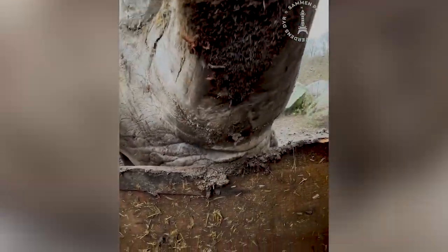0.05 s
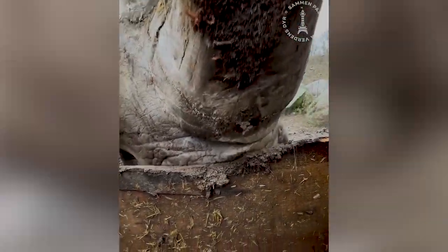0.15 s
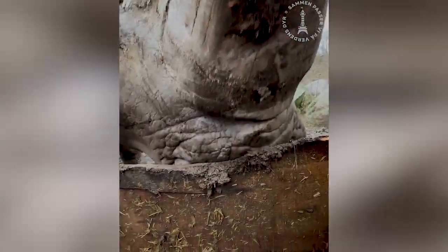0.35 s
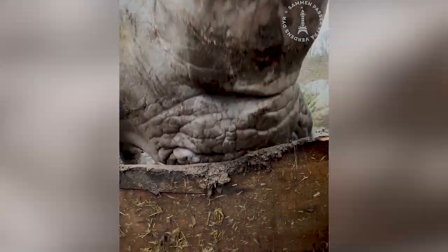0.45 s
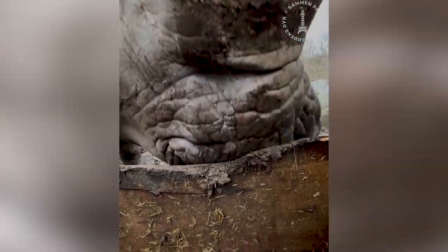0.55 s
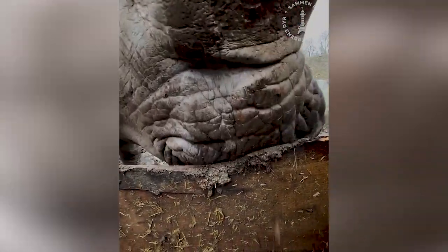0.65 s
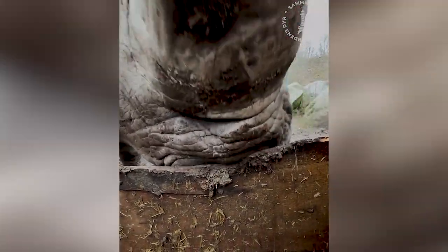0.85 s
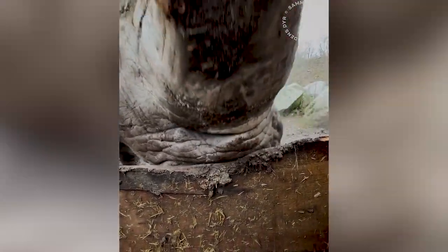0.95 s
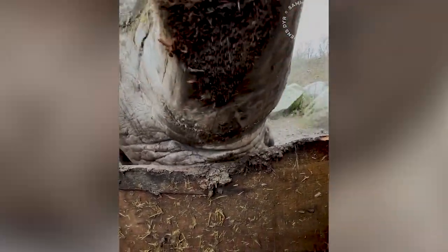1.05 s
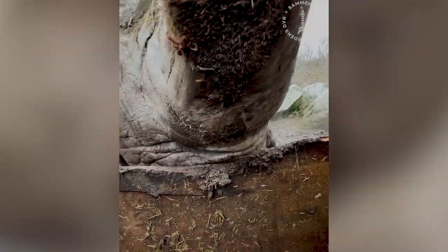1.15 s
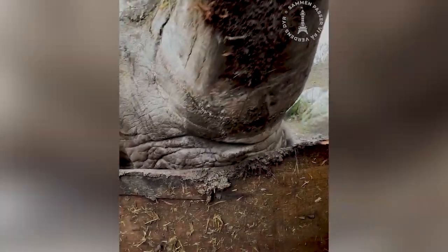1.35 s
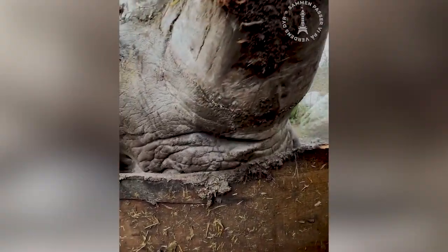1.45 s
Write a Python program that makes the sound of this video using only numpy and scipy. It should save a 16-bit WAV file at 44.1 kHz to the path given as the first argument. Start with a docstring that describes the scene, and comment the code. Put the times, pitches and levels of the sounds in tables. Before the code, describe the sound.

Rough horn scrapes on wood, heard up close in still outdoor air: a rhino's light rub stutters, then two strong rasping strokes and a lighter one follow. Small splinters snap and the heavy log rumbles and bumps softly.

```python
"""A rhinoceros rubs its horn to and fro on a log, close by.
A light drag catches in a short stick-slip judder and runs on as a hard scrape; a return scrape
and another light drag follow. Each slip excites the hollow log's modes, the wood fibres rasp and
hiss, splinters snap, and the heavy log rumbles under the load. Behind it are faint outdoor air
and one thin, far whistle."""
import sys
import numpy as np
from scipy import signal
from scipy.fft import rfft, irfft, next_fast_len
from scipy.io import wavfile
from scipy.ndimage import uniform_filter1d, map_coordinates

SR = 44100
rng = np.random.default_rng(int(sys.argv[2]) if len(sys.argv) > 2 else 0)


def file_out(sig):
    """Save sig as 16-bit WAV at sys.argv[1]."""
    # one column per channel
    cols = np.atleast_2d(sig).T
    # limit, then scale
    lim = np.clip(cols, -1, 1)
    pcm = np.round(lim * 32767).astype(np.int16)
    wavfile.write(sys.argv[1], SR, pcm)


N = 66150

# Modes of the hollow log: pitch_hz, width_hz, gain_db
LOG_MODES = [(314.3, 31.7, 3.5), (363.4, 34, -3), (434.4, 21.3, -3.5), (499, 17, -1), (561.4, 28.8, 1),
             (768, 110, -21), (891, 23.3, -7.5)]
# Low modes of the log on its bed: pitch_hz, width_hz, gain_db
BED_MODES = [(84.3, 26.6, 5.5), (130, 43, -0.5)]
# Spectrum of the fibres in the hard scrape: frequency_hz, gain_db
PUSH_SPECTRUM = [(590, 11.5), (1000, -5.5), (1200, -1), (1320, -3), (1490, -1), (2130, -2), (2590, 1.5),
                 (4390, -10), (5150, -5.5), (5980, -10), (7270, -8), (8640, -11), (10100, -12),
                 (15500, -16)]
RASP_LOW_HZ, HISS_LOW_HZ = 895, 4450


def amp(db):
    """Decibels to amplitude ratio."""
    return 10 ** (np.asarray(db) / 20)


def unit(x):
    """Normalisation to rms 1."""
    return x / np.sqrt(np.mean(x ** 2) + 1e-20)


def steady(x, size):
    """Normalisation to rms 1 over a sliding window of size samples."""
    power = uniform_filter1d(np.mean(x ** 2, axis=0), size)
    return x / np.sqrt(np.abs(power) + 1e-12)


def along(points, hz):
    """Interpolation of (frequency_hz, value) points on a logarithmic axis."""
    f, values = np.transpose(points)
    return np.interp(np.log(hz + 1), np.log(f + 1), values)


def clock():
    """Time of each sample in seconds."""
    return np.arange(N) / SR


def curves(rows):
    """Linear interpolation in time of each column after the first."""
    time_s, *columns = np.transpose(rows)
    return [np.interp(clock(), time_s, column) for column in columns]


def wobble(per_s):
    """Smooth random modulation: a spline through per_s knots a second."""
    return map_coordinates(rng.standard_normal(N), [clock() * per_s + 2])


def filtered(x, response):
    """Linear filtering: the spectrum of x times a frequency response."""
    size = next_fast_len(N + 8192, real=True)
    return irfft(rfft(x, size) * response(np.fft.rfftfreq(size, 1 / SR)), size)[..., :N]


def above(f, edge_hz, order=6):
    """Magnitude response of a steep high-pass."""
    ratio = (f / edge_hz) ** order
    return ratio / np.sqrt(1 + ratio * ratio)


def ring(x, modes, damping=1):
    """Modal superposition: x drives damped resonators of alternating sign."""
    def response(f):
        total = 0
        for k, (hz, width_hz, db) in enumerate(modes):
            loss = 1j * f * width_hz * damping
            total += (-1) ** k * amp(db) * loss / (hz * hz - f * f + loss)
        return total
    return filtered(x, response)


def spread(pair):
    """Partial coherence: two independent signals become left and right, most alike in the bass."""
    # Likeness of left and right: frequency_hz, correlation
    coherence = [(60, 1), (110, 1), (200, 1), (380, 0.95), (700, 0.56), (1290, 0.99), (2380, 1),
                 (4400, 0.12), (6500, 1), (9000, 0.68), (15000, 0.71)]
    angle = lambda f: np.arccos(np.clip(along(coherence, f), -1, 1)) / 2
    mid, side = filtered(pair, lambda f: np.array([np.cos(angle(f)), np.sin(angle(f))]))
    return np.array([mid + side, mid - side])


def fibres(slips_per_s=5000, scatter_db=2.5, slip_share=0.45):
    """Shot noise: countless tiny slips of wood fibres over a smooth rub."""
    hits = rng.random((2, N)) < slips_per_s / SR
    slips = hits * rng.choice([-1, 1], (2, N)) * amp(scatter_db * rng.standard_normal((2, N)))
    rub = rng.standard_normal((2, N))
    return spread(np.sqrt(slip_share) * unit(slips) + np.sqrt(1 - slip_share) * rub)


def bright_spots(x, depth_db=1.73):
    """Spectral modulation: bright spots come and go as the contact moves over the grain."""
    spectra = signal.stft(x, nperseg=512)[2]
    patches = uniform_filter1d(rng.standard_normal(spectra.shape[1:]), size=7, axis=0)
    patches = uniform_filter1d(patches, size=5, axis=1)
    return signal.istft(spectra * amp(depth_db * unit(patches)), nperseg=512)[1][:, :N]


def upper_modes(x, depth_db=1.5, spacing_hz=44.9):
    """Modal overlap: the crowded upper modes of horn and log ripple the spectrum."""
    knots = rng.standard_normal(SR)
    return filtered(x, lambda f: amp(depth_db * map_coordinates(knots, [f / spacing_hz])))


def scrapes():
    """Sliding friction rings the log, rasps and hisses; each stroke meets the grain differently."""
    # Envelopes of the four strokes: time_s, ring_db, rasp_db, hiss_db
    lead_in = [(0.0, -53.5, -62, -55), (0.018, -46.5, -52, -54), (0.068, -46.5, -45, -49.5),
               (0.112, -50, -50, -54.5), (0.158, -44, -45, -47.5), (0.205, -38.5, -44.5, -51)]
    push = [(0.325, -30, -37.5, -42), (0.365, -39.5, -33, -40), (0.381, -29, -33, -38.5),
            (0.409, -44.5, -33.5, -37.5), (0.473, -36.5, -38.5, -40.5), (0.485, -33.5, -33.5, -38),
            (0.541, -41.5, -38.5, -42), (0.599, -41, -44.5, -48), (0.627, -41, -57, -57),
            (0.641, -63, -64, -69), (0.66, -73, -72, -77)]
    pull = [(0.69, -81, -66.5, -70), (0.758, -55, -57, -56.5), (0.768, -52, -56, -57),
            (0.806, -53, -55, -50), (0.884, -33.5, -33, -40.5), (0.93, -40, -32.5, -40.5),
            (1.028, -39, -36.5, -43.5), (1.066, -46, -46.5, -55), (1.086, -63, -62, -72),
            (1.1, -78, -66, -78)]
    drag = [(1.13, -65, -70, -75), (1.15, -60, -62.5, -69), (1.194, -52.5, -55, -55.5),
            (1.302, -53, -54, -54), (1.314, -57.5, -53, -53.5), (1.388, -50.5, -52, -54),
            (1.402, -43.5, -47.5, -50.5), (1.5, -40.5, -49, -53.5)]
    # Spectra of the rubbed fibres: frequency_hz, gain_db
    lead_in_spectrum = [(590, -43), (1000, -18), (1290, -7.5), (1660, -7.5), (2010, -0.5), (3410, -9),
                        (3740, -11), (5460, -10.5), (8440, -16), (15500, -20)]
    pull_spectrum = [(590, 4), (1000, -4.5), (1240, -12), (1460, -4), (1580, -9), (1820, -0.5), (1970, -7),
                     (2360, -3.5), (2740, -9.5), (3260, -9.5), (4440, -13.5), (4700, -8.5), (6790, -9),
                     (7610, -7.5), (9470, -8), (11800, -12), (15500, -14)]
    drag_spectrum = [(590, -16), (1000, -3), (1430, -4.5), (2160, -3), (2620, -2.5), (2840, -6),
                     (3010, -6.5), (4920, -5.5), (6410, -3), (15500, -10.5)]
    # Coupling of each stroke's contact point to the log's lowest mode: gain_db
    coupling_db = [-3, -3, -6.5, 3]
    strokes = [lead_in, push, pull, drag]
    ring_db, rasp_db, hiss_db = curves(np.vstack(strokes))
    drive = fibres()
    coarse = upper_modes(bright_spots(fibres()))
    fine = upper_modes(bright_spots(fibres()))
    below_hiss = lambda f: np.sqrt(np.abs(1 - above(f, HISS_LOW_HZ) ** 2))
    coarse = filtered(coarse, lambda f: above(f, RASP_LOW_HZ) * below_hiss(f))
    fine = filtered(fine, lambda f: above(f, HISS_LOW_HZ))
    out = np.zeros((2, N))
    for k, spectrum in enumerate([lead_in_spectrum, PUSH_SPECTRUM, pull_spectrum, drag_spectrum]):
        active, = curves([(row[0], j == k) for j, stroke in enumerate(strokes) for row in stroke])
        modes = [(hz, width, db + coupling_db[k] * (j == 0))
                 for j, (hz, width, db) in enumerate(LOG_MODES)]
        body = amp(ring_db + 0.5) * steady(ring(drive, modes), size=1500)
        rasp, hiss = filtered(np.array([coarse, fine]), lambda f: amp(along(spectrum, f)))
        rasp = amp(rasp_db - 0.5) * steady(rasp, size=2000)
        hiss = amp(hiss_db + 0.5) * steady(hiss, size=2000)
        out += np.sqrt(active) * (body + rasp + hiss)  # equal-power crossfade
    return out * amp(-0.02 * wobble(per_s=180))


def rumble(lurch_db=1.5):
    """Forced vibration: the log shudders on its bed under a lurching load, and rocks three times."""
    # Envelope of the shudder: time_s, level_db
    envelope = [(0, -55), (.05, -41), (.18, -45.5), (.3, -32.5), (.4, -44.5), (.49, -37.5), (.61, -41.5),
                (.77, -48), (.85, -45.5), (.92, -45), (.97, -41), (1.14, -41), (1.25, -43), (1.37, -45.5),
                (1.45, -36.5), (1.5, -41.5)]
    # Spectrum of the shudder: frequency_hz, gain_db
    spectrum = [(20, -44), (35, -2), (50, -4.5), (80, 2), (110, -3.5), (145, -3.5), (190, -18), (300, -23),
                (700, -30), (2000, -84)]
    # Bumps of the rocking log: start_s, peak_db
    rocks = [(.893, -30), (1.168, -30.5), (1.452, -29)]
    level_db, = curves(envelope)
    shudder = filtered(spread(rng.standard_normal((2, N))), lambda f: amp(along(spectrum, f)))
    thump = ring(signal.unit_impulse(N), BED_MODES[:1], damping=1.1)
    thump = ring(thump, BED_MODES[:1], damping=1.1)  # a second pass rounds the attack
    thump /= np.abs(thump).max()
    bumps = sum(amp(db) * np.pad(thump, (round(start_s * SR), 0))[:N] for start_s, db in rocks)
    return amp(level_db + lurch_db * wobble(per_s=44)) * steady(shudder, size=1500) + bumps


def air(level_db=-52.5):
    """Stationary noise: the faint background of still outdoor air."""
    # Spectrum of the background: frequency_hz, gain_db
    spectrum = [(30, -8.5), (150, -0.5), (300, -3), (500, -12), (1200, -13.5), (2500, -29.5), (3700, -36),
                (4400, -44), (5300, -33), (8000, -35), (15000, -39)]
    noise = spread(rng.standard_normal((2, N)))
    return amp(level_db) * unit(filtered(noise, lambda f: amp(along(spectrum, f))))


def splinters():
    """Narrow-band transients: raised fibres snap or squeak as the horn catches them."""
    # Catches: start_s, length_s, pitch_hz, half_width_hz, level_db
    catches = [(0.048, 0.011, 2130, 700, -48), (0.117, .012, 6400, 894, -50.5),
               (0.378, 0.0058, 2400, 447, -29.5), (.763, 0.0071, 8900, 2000, -48),
               (0.765, 0.0078, 3330, 398, -49.5), (0.767, 0.011, 2360, 493, -47),
               (0.809, 0.018, 9300, 600, -50), (0.969, 0.017, 1820, 695, -35),
               (1.277, 0.0074, 8400, 1500, -50), (1.338, 0.0064, 6640, 1000, -51)]
    out, grit = np.zeros((2, N)), fibres()
    for start_s, length_s, pitch_hz, half_width_hz, level_db in catches:
        age = np.maximum(clock() - start_s, 0) / length_s
        envelope = 2 * age * np.exp(1 - 2 * age)
        mode = [(pitch_hz, 2 * half_width_hz, 0)]
        out += amp(level_db) * envelope * unit(ring(ring(grit, mode), mode))
    return out


def judder(jitter_s=0.00028, scatter_db=0.5, crack_s=0.00092, roughness=0.62, contact_hz=1540):
    """Stick-slip oscillation: each slip of a quickening train thuds, rings the log and cracks."""
    # Course of the judder: time_s, slips_per_s, thud_db, ring_db, crack_db
    course = [(.2175, 102, -30, -25.5, -37.5), (.238, 95, -18, -26.5, -30.5),
              (.256, 141.5, -55, -18, -34.5), (.272, 153.4, -19, -17.5, -30.5),
              (.295, 144, -52, -14, -35.5), (.312, 163, -36, -51, -49)]
    # Spectrum of the dry crack: frequency_hz, gain_db
    crack_spectrum = [(590, -41), (1000, -13), (1130, -17), (1510, -8), (1920, 0.5), (2130, -1),
                      (2530, 5.5), (4390, -15.5), (7030, -24), (15500, -44)]
    slips_per_s, thud_db, ring_db, crack_db = curves(course)
    t = clock()
    active = (t >= course[0][0]) & (t < course[-1][0])
    cycles = np.cumsum(slips_per_s * active) / SR
    starts = np.flatnonzero(np.diff(np.ceil(cycles)))
    timing, strength = rng.standard_normal((SR, 2))[:len(starts)].T
    slips = np.zeros(N)
    slips[starts + np.round(jitter_s * SR * timing).astype(int)] = amp(scatter_db * strength)
    age = t[:SR // 20] / crack_s
    bursts = signal.fftconvolve(slips, age * np.exp(-age))[:N]
    contact = signal.butter(2, contact_hz, fs=SR, output="sos")  # a broad contact softens each slip
    thud = ring(signal.sosfilt(contact, slips) * amp(thud_db), BED_MODES)
    centred = unit(slips) * np.array([[1], [0]])
    rough = roughness * unit(bursts * rng.standard_normal((2, N)))
    force = signal.sosfilt(contact, spread(centred + rough))
    knock = ring(force * amp(ring_db), LOG_MODES, damping=1.6)
    crack = bursts * amp(crack_db) * spread(rng.standard_normal((2, N)))
    crack = filtered(crack, lambda f: amp(along(crack_spectrum, f)) * above(f, RASP_LOW_HZ))
    crackle = bursts * amp(crack_db) * fibres()  # fine fibres tear with each slip
    crackle = filtered(crackle, lambda f: above(f, HISS_LOW_HZ) * amp(along(PUSH_SPECTRUM, f)))
    at_level = lambda x, db: unit(x) * np.sqrt(np.mean(active * amp(db) ** 2))
    return (at_level(thud, thud_db) + at_level(knock, ring_db)
            + at_level(crack, crack_db) + at_level(crackle, db=-47))


def whistle(waver_hz=25):
    """Frequency modulation: a faint, high, wavering tone, perhaps a distant bird."""
    # Contour of the whistle: time_s, pitch_hz, level_db
    contour = [(.640, 5900, -85), (.656, 5660, -67), (.684, 5630, -67), (.696, 5730, -78),
               (.735, 5800, -70), (.75, 5800, -90)]
    pitch_hz, level_db = curves(contour)
    active = (clock() > contour[0][0]) & (clock() < contour[-1][0])
    phase = 2 * np.pi * np.cumsum(pitch_hz + waver_hz * wobble(per_s=300)) / SR
    return active * amp(level_db) * np.sqrt(2) * np.sin(phase)


def scene():
    """Superposition of all sources; a level difference places the log's ring to the right."""
    # Stereo balance: frequency_hz, left_minus_right_db
    balance = [(60, 2.7), (160, -2.5), (290, -4.5), (450, -6), (580, -4), (740, -5.5), (920, 2.1),
               (2000, -1), (3200, 0), (4200, -4), (5300, 4), (6500, -0.5), (14000, 0.4)]
    sound = scrapes() + judder() + rumble() + splinters() + whistle() + air()
    return filtered(sound, lambda f: amp(np.array([along(balance, f), -along(balance, f)]) / 2))


def record(dry, low_cut_hz=48, top_hz=15800):
    """Band limiting: the deepest bass rolls off and nothing passes above top_hz."""
    return filtered(dry, lambda f: above(f, low_cut_hz, order=4) * (f < top_hz))


dry = scene()
out = record(dry)
file_out(out)
```